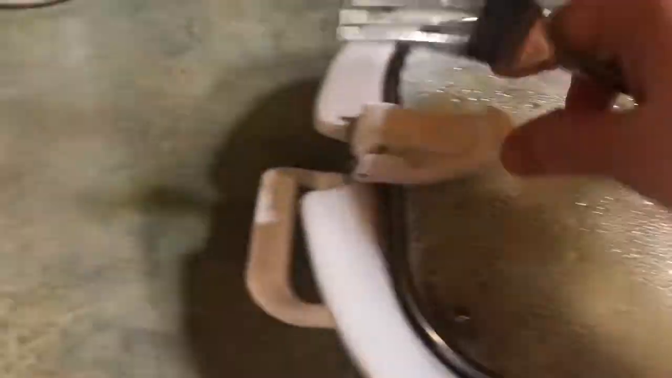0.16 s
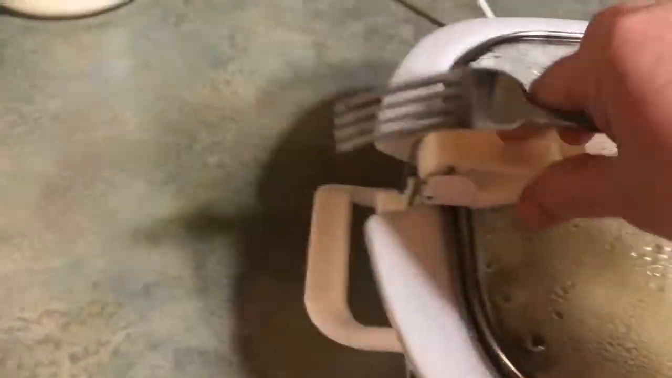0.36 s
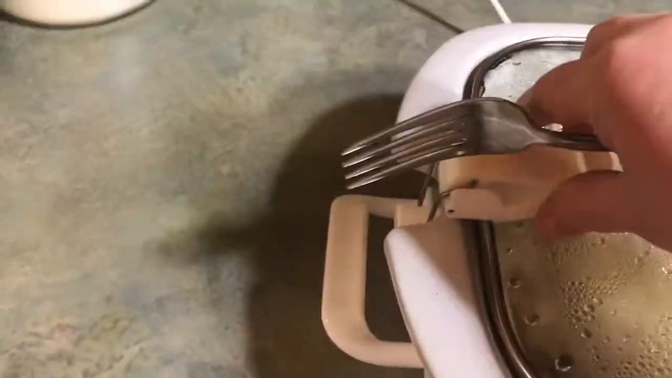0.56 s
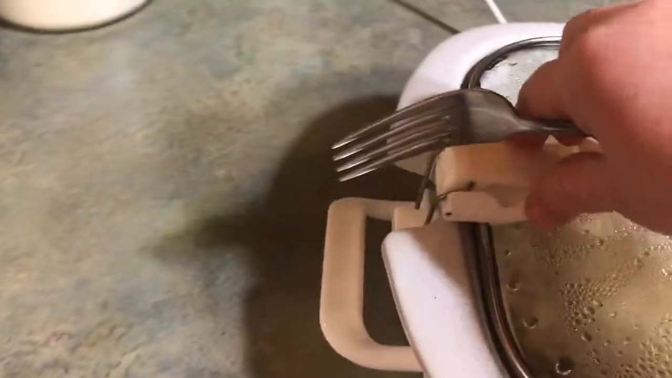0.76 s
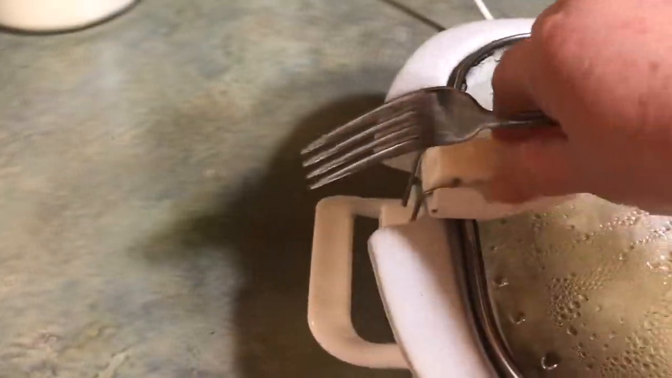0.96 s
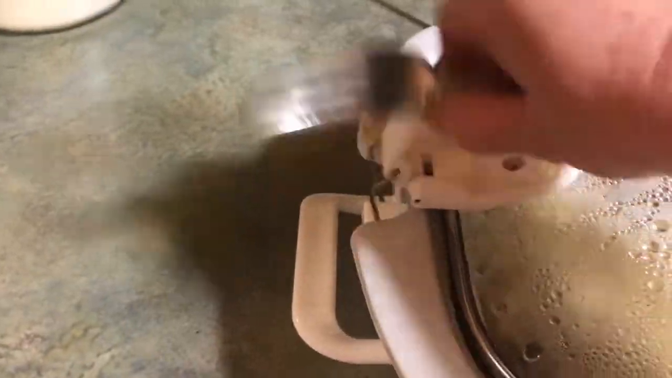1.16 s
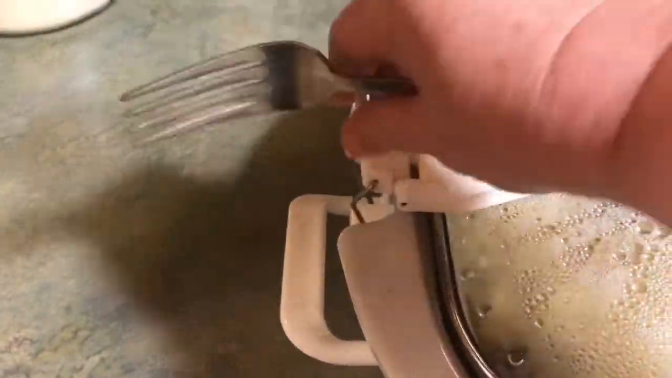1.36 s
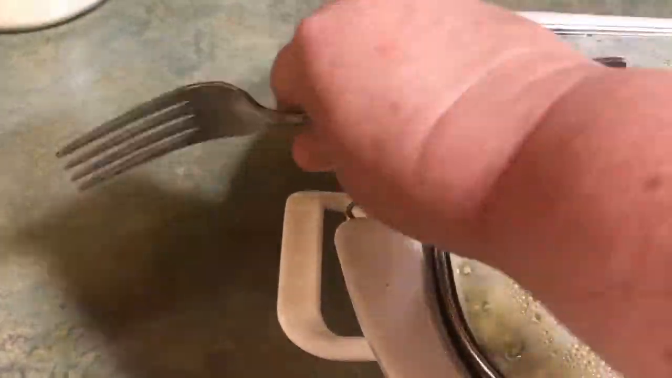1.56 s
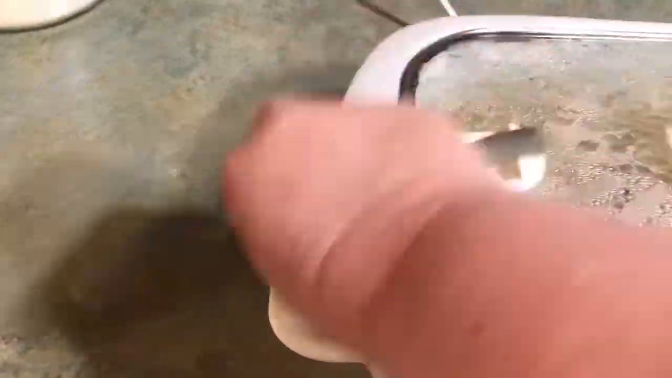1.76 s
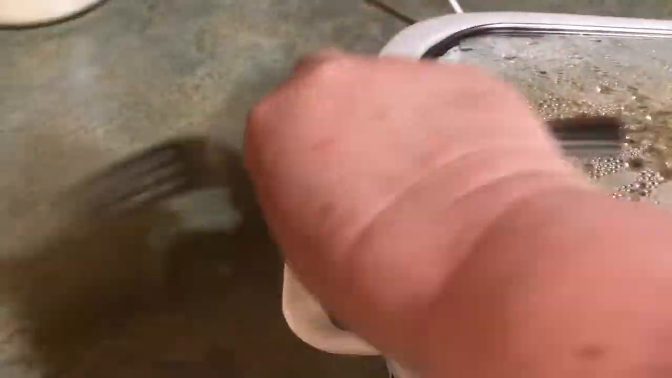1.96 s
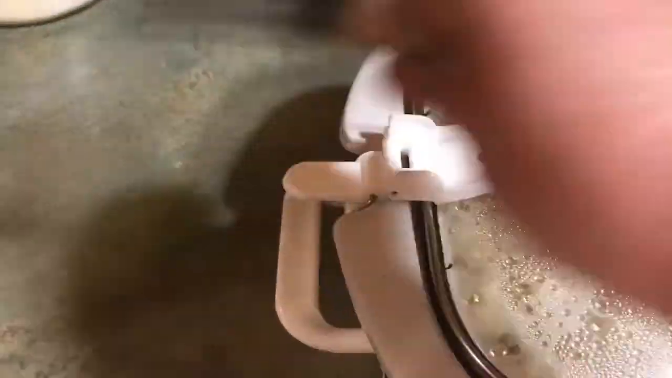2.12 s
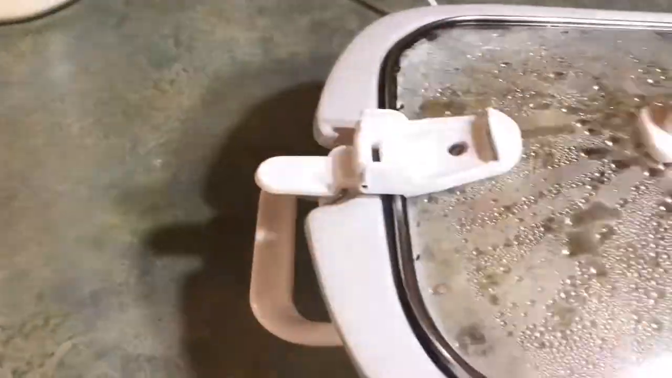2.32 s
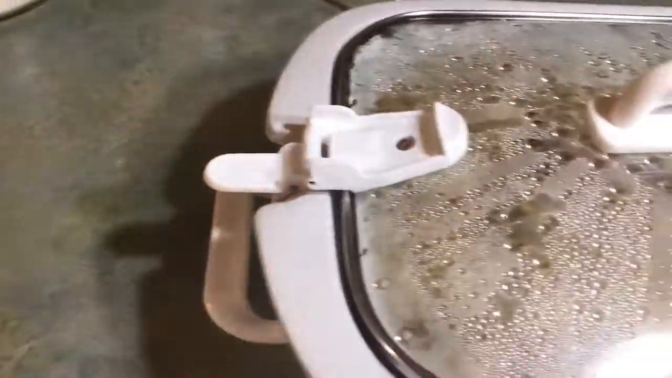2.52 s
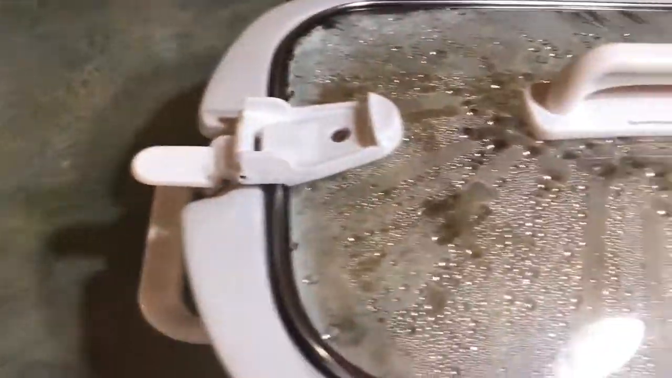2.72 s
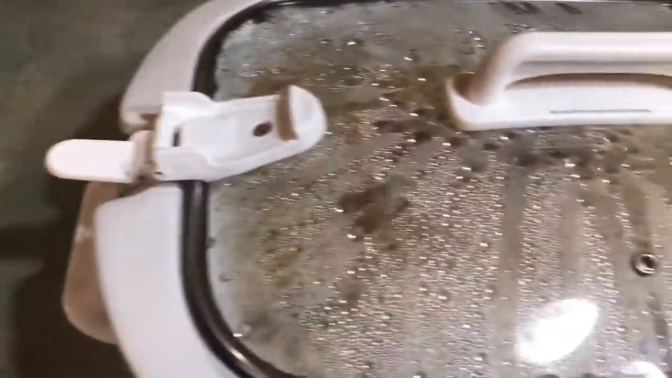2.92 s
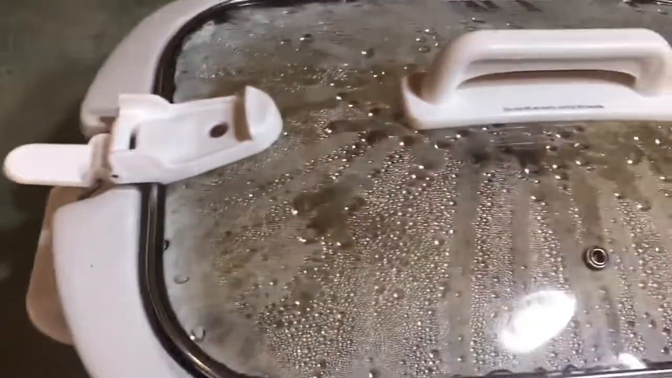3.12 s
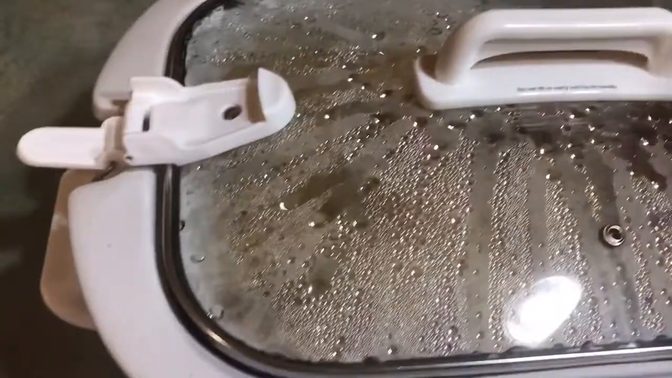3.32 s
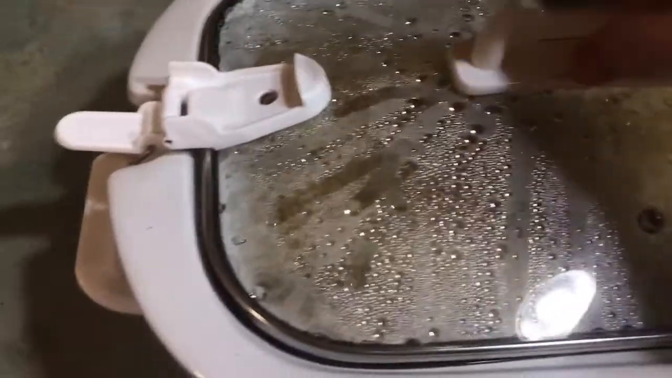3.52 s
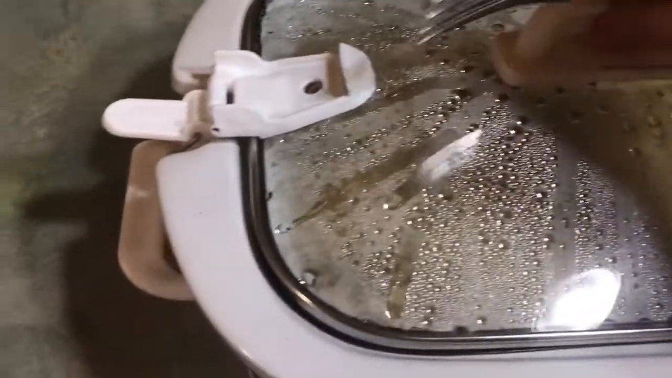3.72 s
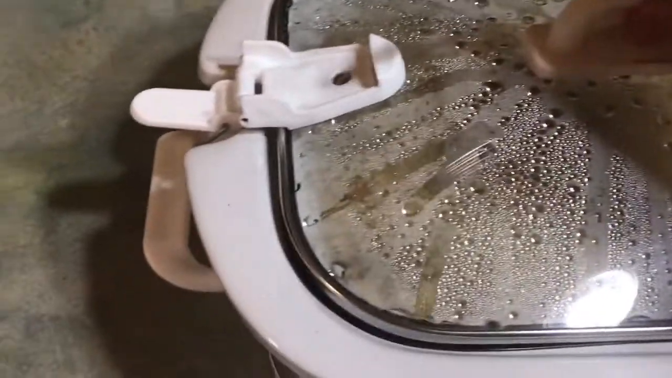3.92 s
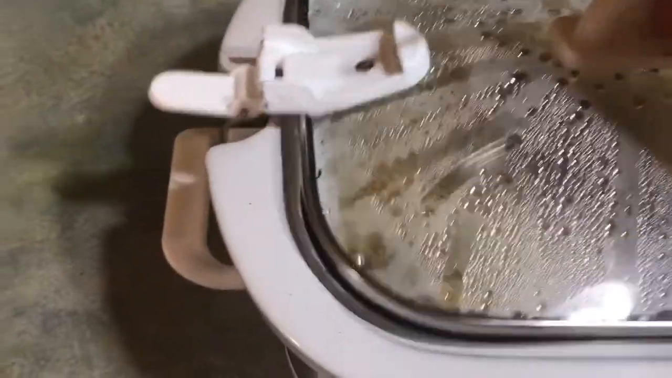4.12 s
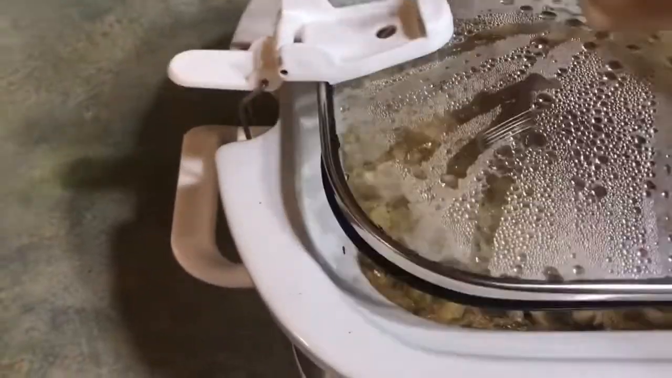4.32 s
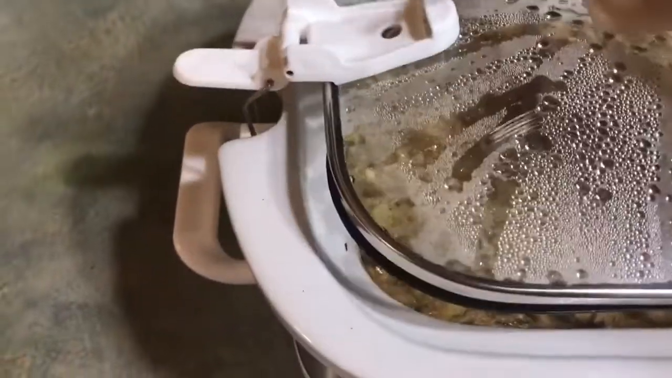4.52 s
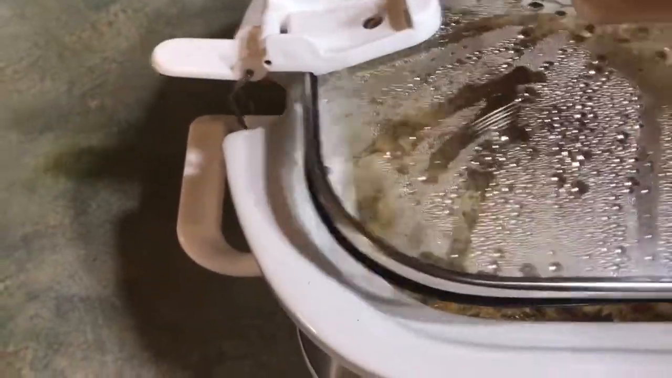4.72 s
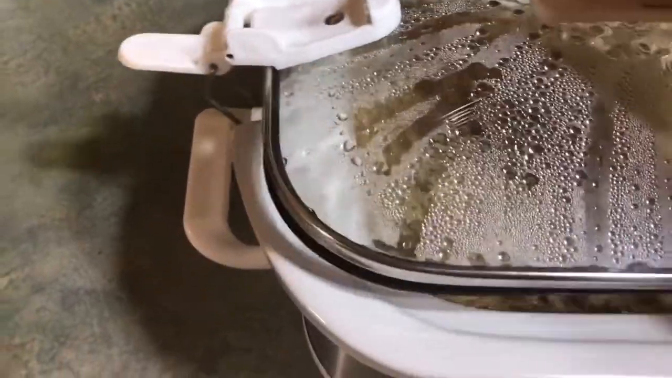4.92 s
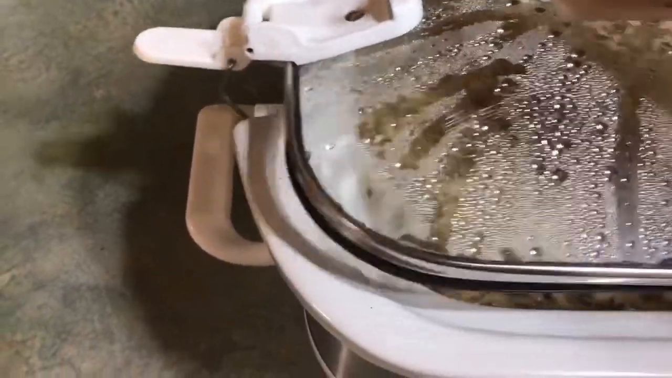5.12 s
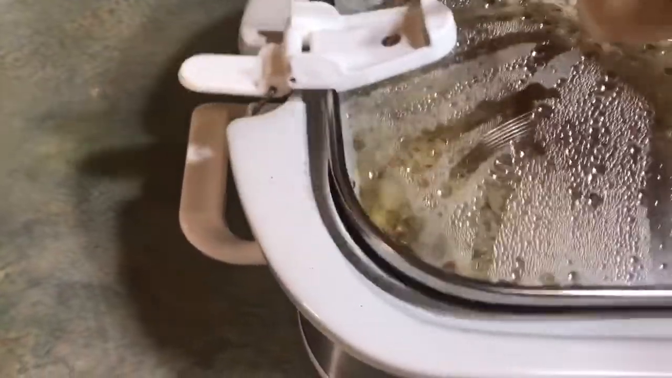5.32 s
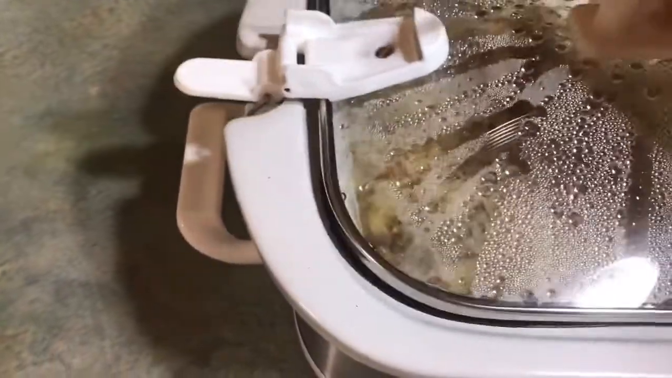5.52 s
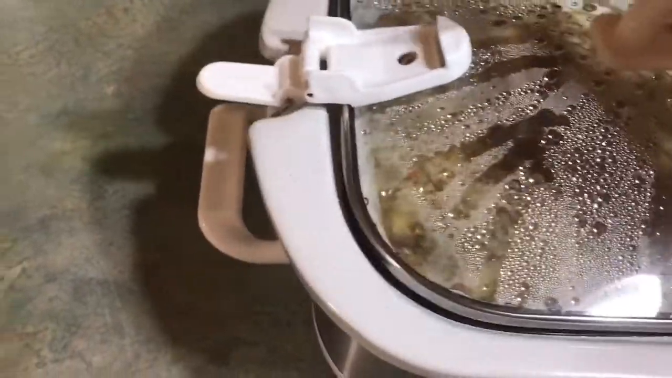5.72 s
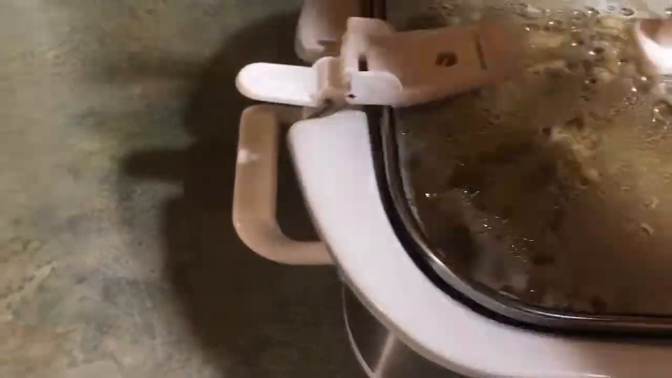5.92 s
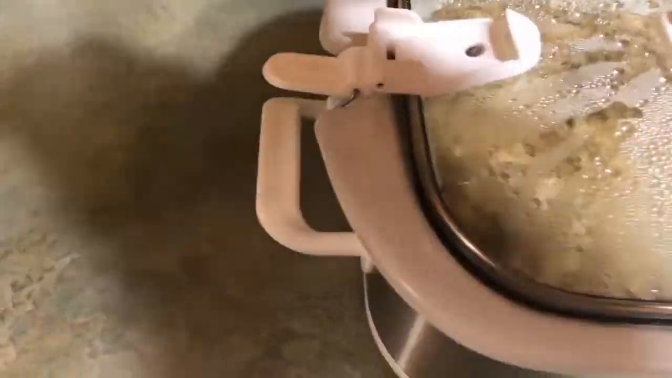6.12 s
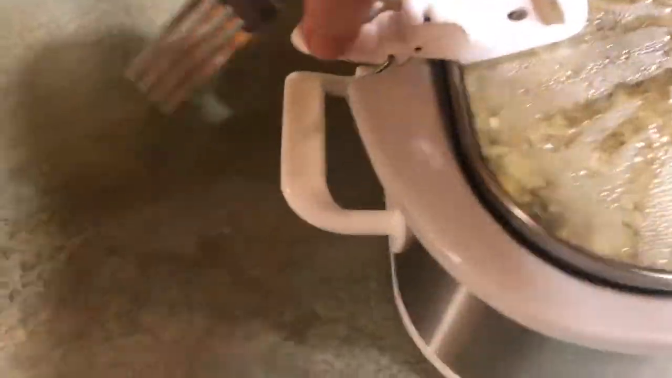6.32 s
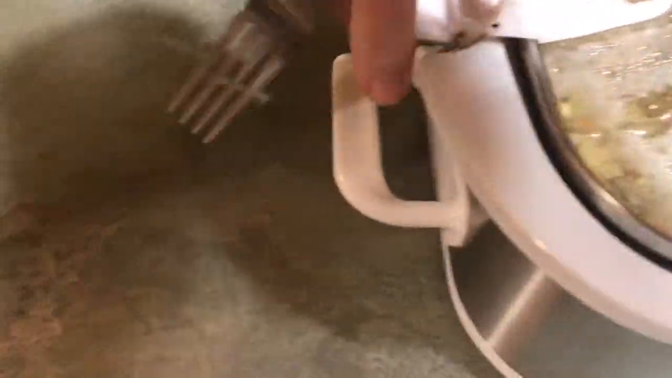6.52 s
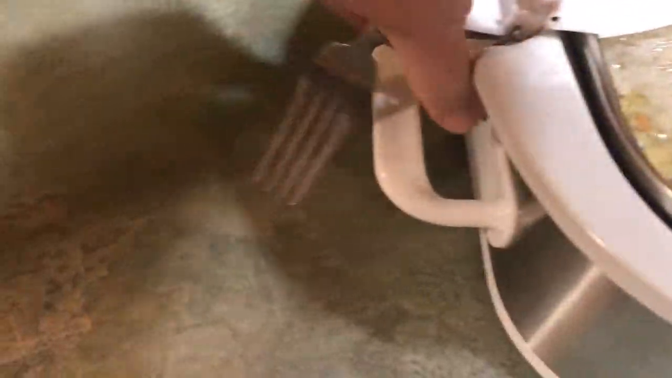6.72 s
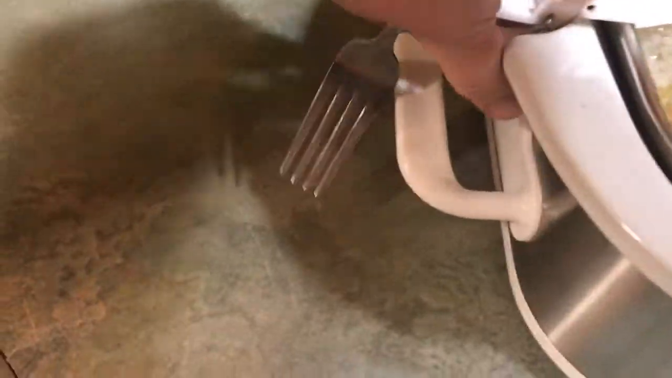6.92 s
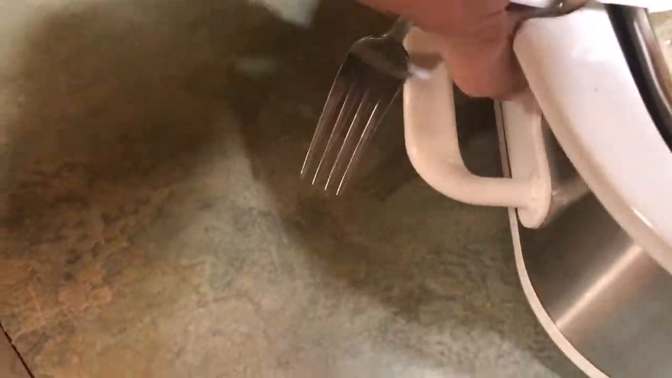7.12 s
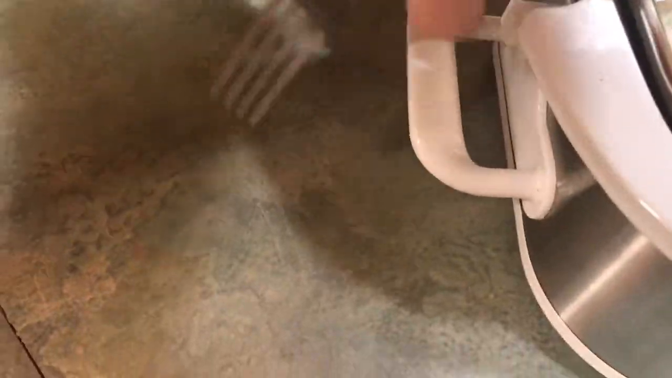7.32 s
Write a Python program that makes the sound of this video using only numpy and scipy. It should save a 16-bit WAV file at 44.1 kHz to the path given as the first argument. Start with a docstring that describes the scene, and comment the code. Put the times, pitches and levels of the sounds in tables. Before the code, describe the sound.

A plastic latch snaps open, then a slow cooker's glass lid is knocked and rattled, close up on a kitchen counter.

```python
"""A slow cooker's plastic latch and glass lid, worked by hand on a kitchen counter, close to a phone mic.
The latch snaps, then the lid is shifted and knocked; each contact rings the modes of lid, latch and pot.
The pot thuds on the counter, a loose wire clasp ticks as it swings, and a fork sings once.
Seal and fingers rub, scratch and crackle. All of this carries a short room tail.
Behind it sit the phone's stepping hiss, room rumble, a humming fridge and one brief low tone."""
import sys
import numpy as np
from scipy import signal
from scipy.fft import rfft, irfft
from scipy.io import wavfile
from scipy.ndimage import uniform_filter1d

SR = 44100
rng = np.random.default_rng(int(sys.argv[2]) if len(sys.argv) > 2 else 0)


def store_pcm(level_fs):
    """Save levels as 16-bit WAV."""
    pcm = np.round(np.clip(level_fs, -1, 1) * 32767).astype(np.int16)
    wavfile.write(sys.argv[1], SR, np.atleast_2d(pcm).T)


N = 328986
TIME = np.arange(N) / SR

# Knocks on latch, lid and pot: (time [s], peak at 1-2.8 kHz [dB], weight below 1 kHz [dB re that peak],
# hardness at 2.8-7 kHz [dB re that peak], favoured low pitch [Hz], favoured high pitch [Hz],
# contact [ms], ring time left by the hand [share])
KNOCKS = [(0.922, -58, 2, 16, 363, 2340, 1.5, 0.2), (0.984, -31.5, -1, -8.5, 478, 780, 1.5, 0.66),
          (1.11, -46, -26, -8, 380, 1910, 8.9, 0.4), (1.196, -46, -2.5, -0.5, 750, 1080, 16, 1),
          (1.212, -31.5, -1, -5, 262, 1670, 13, 0.89), (1.221, -18, -11.5, 9, 1000, 1620, 6.3, 0.29),
          (1.278, -21.5, -8.5, -11, 450, 1690, 3.5, 0.47), (1.79, -40, 4, -5, 302, 1860, 1.4, 0.096),
          (1.796, -37, -10.5, 6, 445, 1190, 6, 1), (1.821, -23.5, -10, 1, 503, 2170, 1.5, 0.56),
          (1.914, -47, 0, 6, 400, 1275, 2.7, 0.65), (2.721, -33.5, -6.5, -2.5, 370, 1780, 4.9, 0.29),
          (2.805, -27.5, -4, -9, 574, 1910, 5.9, 0.7), (2.965, -41, -7.5, 4.5, 430, 1800, 5.9, 0.52),
          (3.208, -39, -6.5, -1.5, 438, 1770, 4.9, 0.24), (3.93, -45, -14, -4.5, 250, 1900, 3.8, 0.25),
          (4.067, -56, 7.5, -3, 280, 1110, 2.5, 0.34), (4.154, -51, 6, -5, 283, 1310, 7, 0.3),
          (4.182, -49.5, -6, -8, 420, 1230, 4.3, 1), (4.244, -24, -0.5, -11.5, 434, 1700, 10, 0.3),
          (4.278, -29.5, -8, -13, 360, 1390, 1.6, 1), (4.313, -20, -6, -11, 456, 1970, 12, 0.22),
          (4.331, -20.5, -4.5, -6, 291, 2260, 5.2, 0.33), (4.346, -21, -9, -13, 750, 1930, 3.1, 0.99),
          (4.388, -25.5, -6.5, -18, 600, 2270, 7.2, 0.29), (4.435, -27, -4, -22, 327, 1780, 2.9, 0.28),
          (4.534, -52.5, 9, -12, 402, 1055, 4, 0.97), (4.606, -29.5, -1.5, -19.5, 364, 1904, 4.2, 0.39),
          (4.755, -43, 0.5, -12.5, 593, 1900, 8.2, 0.47), (4.794, -20.5, -4.5, -9, 380, 2025, 6.9, 0.43),
          (4.931, -41.5, -3, 6, 363, 2380, 4, 1), (4.984, -36, -3, -14, 416, 1360, 2.9, 0.66),
          (5.181, -46, 6.5, -10.5, 422, 1957, 5.6, 0.32), (5.205, -33, -2.5, -13, 434, 1440, 3.8, 0.64),
          (5.259, -26, -4, -11, 460, 1400, 6.1, 0.46), (5.433, -46, 0, -21.5, 597, 1110, 3.4, 0.22),
          (5.55, -46, -24, -3, 600, 2020, 9.7, 0.34), (5.658, -46, -10, -2, 370, 1420, 2.7, 0.79),
          (6.085, -42, -21, -22, 795, 1790, 5.7, 0.32), (6.172, -43.5, -11, -13, 750, 1820, 2.7, 0.43),
          (6.361, -52, 0.5, 1.5, 353, 1920, 3, 0.5), (6.754, -48, -28.5, 1.5, 350, 1650, 3.5, 0.29),
          (6.822, -25, -12.5, -3, 290, 2270, 2.4, 0.27), (6.902, -35, -7.5, -3, 294, 1140, 0.65, 0.47),
          (7.077, -24, 9.5, -9, 636, 1160, 2.8, 0.38), (7.13, -25.5, 5.5, -16.5, 620, 1145, 3.8, 0.33),
          (7.451, -50, -15, -12, 500, 1390, 3, 0.32)]
# The five bands of a knock: (edge [Hz])
KNOCK_EDGES_HZ = [220, 500, 1000, 2800, 7000, 16000]
# Lid, latch and pot ringing freely: (pitch [Hz], relative level [dB], t60 [s])
COOKER_MODES = [(266.5, -32, 0.04), (294, 0, 0.31), (364.6, 7, 0.19), (429, 3, 0.19), (497, -9, 0.04),
                (607.5, -2.5, 0.16), (641.7, -11, 0.326), (682, -3.5, 0.3), (747.6, 1, 0.18),
                (894, -18.5, 0.043), (1110, -7.5, 0.055), (1123, -15, 0.72), (1217, -8.5, 0.2),
                (1364, -1.5, 0.087), (1570, -6, 0.079), (1747, 5.5, 0.059), (1799, -1, 0.1),
                (1946, 2.5, 0.056), (2184, -6, 0.073), (2250, -7.5, 0.061), (2323, 0.5, 0.021),
                (3307, -2, 0.039)]
# The clasp against the pot, once or in a run: (first tap [s], last tap [s], first spit's peak [dB])
CLASP_RUNS = [(0.7859, 0.7862, -42.5), (1.052, 1.052, -44), (1.4041, 1.503, -41.5), (1.94, 1.939, -45.5),
              (2.0122, 2.0118, -46.5), (2.0362, 2.322, -43), (2.4133, 2.5022, -46.5), (2.747, 2.747, -42.5),
              (2.887, 3.177, -42), (3.245, 3.4176, -46.5), (4.182, 4.182, -53), (4.247, 4.346, -43),
              (4.29, 4.29, -48), (4.646, 4.645, -57), (5.7271, 5.7276, -42.5), (5.841, 6.209, -45.5),
              (6.976, 6.976, -49.5), (7.176, 7.176, -56), (7.197, 7.2874, -53.5), (7.3163, 7.3163, -60.5),
              (7.3677, 7.3685, -55.5), (7.337, 7.3374, -52)]
# The pot rocking on the counter: (time [s], peak [dB], pitch [Hz])
THUDS = [(0.981, -43, 177), (1.228, -24.5, 103), (1.253, -28, 114), (1.338, -46, 88.5), (1.798, -19.5, 103),
         (1.846, -24, 114.4), (1.969, -49, 90), (2.721, -36.5, 100.6), (2.947, -49.5, 109),
         (3.219, -38, 94.5), (3.299, -53, 97), (4.069, -43.5, 107), (4.149, -44, 121), (4.244, -46, 126),
         (4.321, -43, 90), (4.611, -46.5, 63), (5.673, -43, 123), (5.717, -39.5, 115), (5.849, -42.5, 99),
         (6.354, -49.5, 118), (6.828, -40.5, 109), (6.903, -48, 114), (7.096, -48, 95),
         (7.323, -49.5, 104.4)]
# The fork's tines: (pitch [Hz], level [dB], t60 [s])
FORK_MODES = [(3978, -61.5, 1.4), (8296, -46, .15), (9372, -59.5, 1.5), (14480, -54, .45)]
# Seal and fingers on glass and pot: (start [s], length [s], scrape rms [dB], groan [dB re scrape])
RUB_STROKES = [(0.891, 0.044, -51.5, -14), (0.954, 0.044, -53, 4), (2.606, 0.1, -67.5, -8.5),
               (4.144, 0.16, -59, 8), (4.347, 0.087, -60.5, 16.5), (4.448, 0.074, -69, 12),
               (5.281, 0.26, -64, 6), (5.519, 0.1, -64, -10.5), (5.614, .2, -61, 0),
               (5.799, 0.91, -67, -12.5), (6.937, .04, -56, -15), (7.014, 0.064, -59.5, 5.5)]
# Broad resonances of the rubbed lid: (centre [Hz], width [Hz], gain [dB])
LID_RESONANCES = [(1412, 100, 3.5), (1890, 200, 9), (2400, 340, -0.5), (5800, 710, -16)]
# Fingers on plastic: (start [s], length [s], centre [Hz], width [Hz], rms at the crest [dB])
SCRATCHES = [(0.855, 0.079, 4080, 900, -65), (0.855, 0.066, 7050, 3000, -69),
             (0.969, 0.047, 3700, 1500, -53.5), (0.996, 0.023, 7500, 4000, -54.5),
             (1.112, 0.013, 4500, 4000, -67), (1.836, 0.096, 5900, 3040, -64),
             (5.316, 0.066, 9000, 1510, -73), (6.356, 0.072, 6400, 5000, -67.5),
             (7.154, 0.044, 6700, 1510, -67)]
# Damp fingers and seal crackling as the lid is handled: (start [s], end [s])
CRACKLE_SPANS = [(3.17, 3.5), (3.74, 4.3), (5.45, 6.65), (7.15, 7.4)]
# The phone's hiss stepping up and down: (time [s], middle rms [dB], treble rms [dB])
HISS_LEVELS = [(0, -65.5, -67), (.25, -65, -65.5), (.28, -67, -73), (1.18, -68.5, -76), (1.3, -68.5, -63.5),
               (1.62, -64.5, -68.5), (1.64, -76, -76.5), (1.95, -62.5, -78), (2.1, -73.5, -78.5),
               (3.49, -75, -75.5), (3.51, -68.5, -67), (4.04, -69.5, -66.5), (4.07, -70.5, -75),
               (4.5, -75.5, -78.5), (5.8, -75, -80), (6.3, -65.5, -75), (7.2, -70, -75), (7.46, -72.5, -76)]
# Spectrum of the hiss: (frequency [Hz], relative density [dB])
HISS_COLOUR = [(300, -19.5), (550, 0.5), (1100, 2.5), (2000, 3), (3500, 0), (6000, -4), (9000, -6),
               (10500, -13), (12500, -6), (16000, -9)]
# Spectrum of the kitchen's rumble: (frequency [Hz], relative density [dB])
RUMBLE_COLOUR = [(15, -40), (25, 1.5), (55, -8), (128, 3.5), (147, -7.5), (173, -4.5), (259, -2),
                 (361, -8.5), (900, -17.5), (1170, -50.5), (1980, -120)]
# Lines of the fridge motor: (pitch [Hz], rms [dB])
FRIDGE_LINES = [(59.5, -75.5), (119.5, -73.5), (178, -80.5), (238, -83), (360, -79.5)]

LATCH_DONE_S, HANDLE_S = 2.1, (6.8, 7.0)  # when the hand leaves the latch; when it taps the pot's handle
LEAN_HZ, LEAN_DB_PER_OCTAVE = 419, 18.5  # a low pitch above this favours 0.5-1 kHz, below it 0.2-0.5 kHz
TOP_PER_HARDNESS, SOFT_TOP_HZ = 0.32, 12000  # hard knocks gain top; soft ones after the latch lose it


def knocks(crack_t60=0.037, rattle_db=-10, rattle_t60=0.46, band_speedup=0.72, dull_hz=2600, rise=0.17):
    """A rough contact rings latch, lid and pot; a crack and a longer rattle of noise ride on top."""
    out, t = np.zeros(N), TIME[:SR // 3]
    for s, mid_db, weight_db, hard_db, low_hz, high_hz, contact_ms, ring_share in KNOCKS:
        scatter = rng.standard_normal((2, len(COOKER_MODES)))
        roughness, grit = rng.standard_normal((2, len(t)))
        contact_s = contact_ms / 1000
        push = roughness * attack(t, rise * contact_s) * np.exp(-t / contact_s)
        modes = cooker_ring(t, low_hz, high_hz, ring_share, scatter)
        body = signal.fftconvolve(modes, push[:SR // 20])[:len(t)]
        noise_share, edge, top_db = struck_surface(s)
        noise = cut(grit, dull_hz, "lowpass") + edge * grit
        lean_db = LEAN_DB_PER_OCTAVE * np.log2(low_hz / LEAN_HZ)
        bands_db = [weight_db - max(lean_db, 0), weight_db + min(lean_db, 0), 0,
                    hard_db, hard_db * (1 + TOP_PER_HARDNESS) + top_db]
        for k, band_db in enumerate(bands_db):
            lo_hz, hi_hz = KNOCK_EDGES_HZ[k:k + 2]
            if s > LATCH_DONE_S and hard_db < 0:
                hi_hz = min(hi_hz, SOFT_TOP_HZ)
            band_t = t / band_speedup ** k  # each band up starts and dies sooner
            crack = decay(band_t, crack_t60 + contact_s)
            rattle = undb(rattle_db) * decay(band_t, rattle_t60 * ring_share)
            burst = noise * attack(band_t, rise * contact_s) * (crack + rattle)
            part = peak(band(burst, lo_hz, hi_hz, order=3))
            if lo_hz < COOKER_MODES[-1][0]:  # above the highest mode only noise is left
                ringing = peak(band(body, lo_hz, hi_hz, order=3))
                part = peak(noise_share * part + (1 - noise_share) * ringing)
            add(out, s, undb(mid_db + band_db) * part)
    return out


def cooker_ring(t, low_hz, high_hz, ring_share, scatter, focus_db=9, focus_octaves=0.19, scatter_db=2):
    """Modes near the two favoured pitches ring most; the hand shortens them all."""
    hz, db, t60 = np.transpose(COOKER_MODES)
    nearness = sum(np.exp(-(np.log2(hz / f) / focus_octaves) ** 2) for f in (low_hz, high_hz))
    spot_db = focus_db * nearness + scatter_db * scatter[1]
    detuned_hz = hz * (1 + 0.011 * scatter[0])
    return ring(t, detuned_hz, db + spot_db, t60 * ring_share)


def struck_surface(s):
    """What is knocked at time s: (noise [share], bright edge [gain], offset above 7 kHz [dB])."""
    if s < LATCH_DONE_S:
        return 0.58, 0.58, -8  # dead plastic latch, the brightest
    if HANDLE_S[0] < s < HANDLE_S[1]:
        return 0.58, 0.38, -24  # thick plastic handle
    return 0.35, 0.38, -11  # heavy glass lid


def counter_thuds(rise_s=0.0043, t60=0.11, shake_db=-12):
    """The heavy pot loads the counter softly, so its low mode swells and dies; the cupboard shakes."""
    out, t = np.zeros(N), TIME[:SR // 2]
    for s, db, hz in THUDS:
        shake = undb(shake_db) * unit(band(rng.standard_normal(len(t)), 36, 85))
        thud = (np.sin(2 * np.pi * hz * t) + shake) * attack(t, rise_s) * decay(t, t60)
        add(out, s, undb(db) * peak(thud))
    return out


def clasp_ticks(swing_s=0.092, fade_db_per_tap=-1, dull_db=-3, knock_db=-10):
    """A swinging wire taps hard steel: a bright spit, a duller one and a faint knock of the pot."""
    out, t = np.zeros(N), TIME[:SR // 15]
    for first, last, db in CLASP_RUNS:
        count = round((last - first) / swing_s) + 1
        for k, s in enumerate(np.linspace(first, last, count)):
            grit = rng.standard_normal((3, len(t)))
            spit = peak(band(grit[0] * decay(t, t60=0.0099), 8700, 16800))
            dull = peak(band(grit[1] * decay(t, t60=0.044), 1900, 5500))
            knock = peak(band(grit[2] * decay(t, t60=0.064), 600, 1300))
            tick = spit + undb(dull_db) * (dull + undb(knock_db) * knock)
            add(out, s, undb(db + fade_db_per_tap * k) * tick)
    return out


def fork(struck_s=1.222, gripped_s=1.79, damp_s=0.019):
    """Thin steel tines ring on after the latch snaps, until the hand grips them."""
    out = np.zeros(N)
    add(out, struck_s, ring(TIME[:SR], *np.transpose(FORK_MODES)))
    return out * np.clip((gripped_s - TIME) / damp_s, 0, 1)


def seal_rub(grain_db=3, grains_per_s=150):
    """Rubber and fingers stick and slip: grains of noise in the lid's resonances, a dull groan below."""
    slips = rng.standard_normal(N) * undb(grain_db * walk(grains_per_s))
    scrape = unit(sum(undb(db) * band(slips, hz - width / 2, hz + width / 2, order=1)
                      for hz, width, db in LID_RESONANCES))
    groan = unit(band(slips, 191, 410))
    out = np.zeros(N)
    for s, length, db, groan_db in RUB_STROKES:
        stroke = gate(s, length, ramp_s=0.022) ** 2
        out += undb(db) * stroke * (scrape + undb(groan_db) * groan)
    return out


def finger_scratches(grain_db=3, grains_per_s=300):
    """Fingers scratch plastic: gritty noise swells and fades inside one broad resonance."""
    out = np.zeros(N)
    grit = rng.standard_normal(N) * undb(grain_db * walk(grains_per_s))
    for s, length, hz, width, db in SCRATCHES:
        i, n = int(s * SR), int(length * SR)
        scratch = unit(band(grit[i:i + n], hz - width / 2, hz + width / 2))
        add(out, s, undb(db) * np.sqrt(np.hanning(n)) * scratch)
    return out


def damp_crackle(clicks_per_s=22, softest_db=-57, range_db=6, t60=0.01):
    """Damp fingers and seal give tiny clicks at random, each in its own part of the treble."""
    out, t = np.zeros(N), TIME[:SR // 50]
    for start, end in CRACKLE_SPANS:
        for when, size, pitch in rng.random((int(clicks_per_s * (end - start)), 3)):
            hz = 4000 * 2 ** (1.3 * pitch)
            click = band(rng.standard_normal(len(t)) * decay(t, t60), hz / 1.4, hz * 1.54)
            add(out, start + when * (end - start), undb(softest_db + range_db * size) * peak(click))
    return out


def room(x, low_t60=0.37, treble_t60=0.17, tail_db=-12.5, build_s=0.0054):
    """Walls and cupboards answer the close sound with a dense tail whose treble dies first."""
    t = TIME[:SR // 2]
    low = band(rng.standard_normal(len(t)), 150, 2000, order=1) * decay(t, low_t60)
    treble = band(rng.standard_normal(len(t)), 2700, 17000, order=1) * decay(t, treble_t60)
    tail = (low + treble) * np.minimum(t / build_s, 1)
    return x + undb(tail_db) * signal.fftconvolve(x, tail / np.linalg.norm(tail))[:N]


def brief_hum(start_s=0.635, length_s=0.115, hz=205, rms_db=-62):
    """One soft low tone, on and off."""
    return gate(start_s, length_s, ramp_s=0.0078) * tone(hz, rms_db)


def phone_hiss(split_hz=4500):
    """Hiss whose middle and treble step up and down abruptly, as from the phone's noise processing."""
    s, middle_db, treble_db = np.transpose(HISS_LEVELS)
    middle = unit(cut(coloured(HISS_COLOUR), split_hz, "lowpass"))
    treble = unit(cut(coloured(HISS_COLOUR), split_hz, "highpass"))
    return undb(np.interp(TIME, s, middle_db)) * middle + undb(np.interp(TIME, s, treble_db)) * treble


def rumble(level_db=-69, waver_db=1):
    """Low room noise, wavering slowly."""
    return undb(level_db + waver_db * walk(1)) * coloured(RUMBLE_COLOUR)


def fridge(waver_db=1, wavers_per_s=4.8):
    """The motor hums in the background, each line wavering in level."""
    return sum(tone(hz, db + waver_db * walk(wavers_per_s)) for hz, db in FRIDGE_LINES)


def undb(db):
    """dB to gain."""
    return 10 ** (np.asarray(db) / 20)


def unit(x):
    """Rms 1."""
    return x / np.sqrt(np.mean(x ** 2))


def peak(x):
    """Peak 1."""
    return x / np.abs(x).max()


def band(x, lo_hz, hi_hz, order=2):
    """Butterworth band-pass."""
    return cut(x, [lo_hz, hi_hz], "bandpass", order)


def cut(x, hz, kind, order=2):
    """Butterworth filter."""
    return signal.sosfilt(signal.butter(order, hz, kind, fs=SR, output="sos"), x)


def add(track, s, x):
    """Mix x into track from time s."""
    i = int(s * SR)
    track[i:i + len(x)] += x[:N - i]


def attack(t, rise_s):
    """Exponential rise to 1."""
    return 1 - np.exp(-t / rise_s)


def decay(t, t60):
    """Falls 60 dB in t60 seconds."""
    return np.exp(-np.log(1000) * t / t60)


def gate(s, length, ramp_s):
    """On from time s, with a ramp at each end."""
    return np.clip(np.minimum(TIME - s, s + length - TIME) / ramp_s, 0, 1)


def tone(hz, rms_db):
    """A sine of steady pitch."""
    return np.sqrt(2) * undb(rms_db) * np.sin(2 * np.pi * hz * TIME)


def ring(t, hz, db, t60):
    """Sum of decaying sines, one for each mode."""
    return undb(db) @ (np.sin(2 * np.pi * np.outer(hz, t)) * decay(t, t60[:, None]))


def walk(rate):
    """Random levels held 1 / rate s and slewed; rms 1."""
    hold = int(SR / rate)
    steps = np.repeat(rng.standard_normal(N // hold + 1), hold)
    return unit(uniform_filter1d(steps, hold)[:N])


def coloured(points):
    """Noise shaped by (frequency [Hz], level [dB]) points; rms 1."""
    hz, db = np.transpose(points)
    bins_hz = np.maximum(np.arange(N // 2 + 1) * SR / N, 1)
    gain = undb(np.interp(np.log(bins_hz), np.log(hz), db))
    return unit(irfft(rfft(rng.standard_normal(N)) * gain, N))


def scene():
    """Everything on the counter shares the room; the background gets no tail. Mono."""
    counter = knocks() + clasp_ticks() + counter_thuds() + fork()
    handling = seal_rub() + finger_scratches() + damp_crackle()
    return (room(counter + handling) + brief_hum() + phone_hiss() + rumble() + fridge())[None]


def record(dry, bass_hz=45, top_hz=15800):
    """The phone mic loses the deepest bass and cuts the top steeply."""
    thin = cut(dry, bass_hz, "highpass", order=3)
    return signal.sosfilt(signal.ellip(8, .2, 70, top_hz, fs=SR, output="sos"), thin)


dry = scene()
out = record(dry)
store_pcm(out)
```